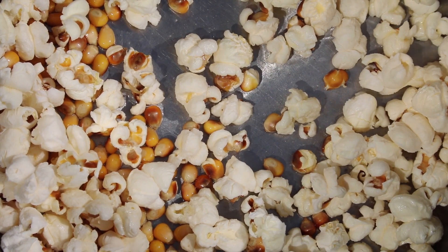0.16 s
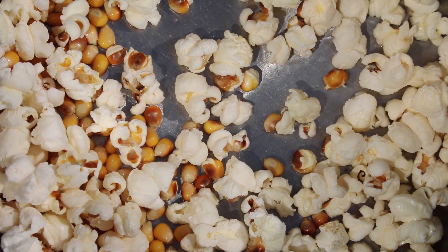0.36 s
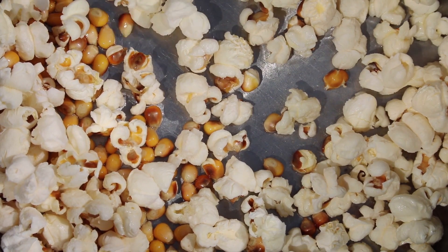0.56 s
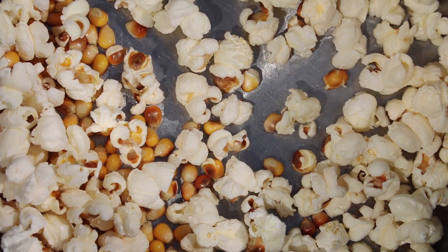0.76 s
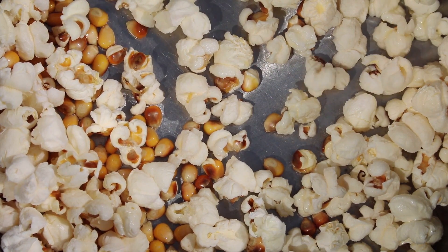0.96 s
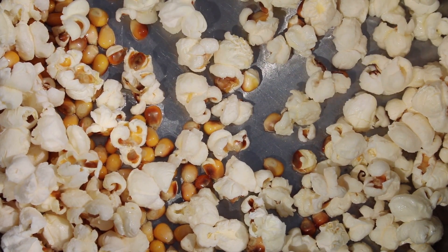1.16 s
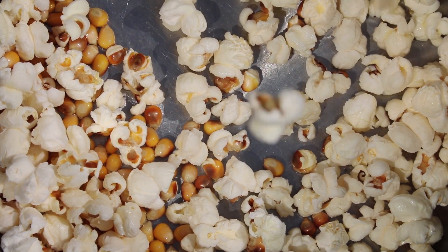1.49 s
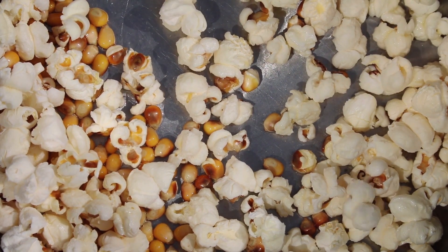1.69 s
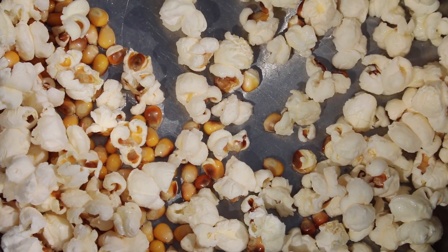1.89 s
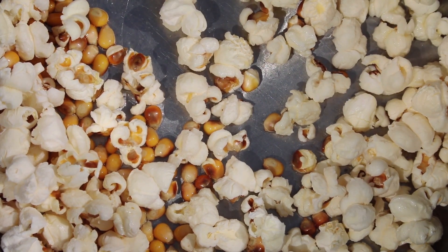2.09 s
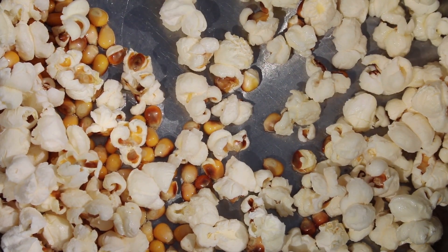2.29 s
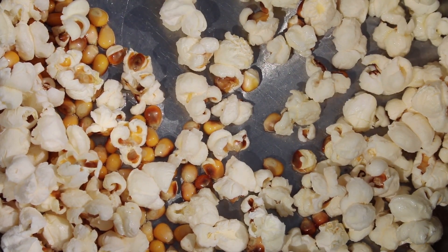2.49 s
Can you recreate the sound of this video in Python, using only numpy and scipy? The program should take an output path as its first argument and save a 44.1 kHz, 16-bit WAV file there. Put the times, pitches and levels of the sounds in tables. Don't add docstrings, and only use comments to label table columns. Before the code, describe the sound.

Popcorn popping in a deep metal pan, hard cracks and quick bounces above low fan rumble

```python
import sys
import numpy as np
from scipy import signal
from scipy.io import wavfile
from scipy.ndimage import uniform_filter1d

SR = 44100
rng = np.random.default_rng(int(sys.argv[2]) if len(sys.argv) > 2 else 0)


def how_loud(loudness_db):
    steps = np.asarray(loudness_db, float) / 20
    return 10 ** steps


def dump_mix(stems):
    frames = np.atleast_2d(stems).T
    limited = np.clip(frames, -1, 1)
    pcm = np.round(limited * 32767).astype(np.int16)
    wavfile.write(sys.argv[1], SR, pcm)


N = 116865


def evened(x):
    return x / np.sqrt(np.mean(x ** 2) + 1e-20)


def read(points, hz):
    f, value = np.transpose(points)
    return np.interp(np.log(hz + 1), np.log(f + 1), value)


def add(mix, start_s, sound):
    part = mix[:, round(start_s * SR):][:, :sound.shape[1]]
    part += sound[:, :part.shape[1]]


def moving_air(shape, level_db, patchy_db, swell_db):
    # f/Hz, width/Hz, level/dB
    duct = [(317, 48, 2), (593, 61, 4.5), (1020, 280, 5.5), (1680, 350, 5.5), (3290, 170, 3),
            (6100, 330, 3)]
    # f/Hz, share (0 to 1)
    likeness = [(30, 1), (130, 0.95), (290, 1), (640, 0.69), (1410, 0.32), (3100, 0.29), (6820, 0.012),
                (15000, 0.088)]
    # f/Hz, left minus right/dB
    balance = [(60, 0.0), (240, 0.5), (950, -0.5), (3770, 2.5), (15000, 9)]
    frames = N // 512 + 5
    hz = np.fft.rfftfreq(2048, 1 / SR)
    a, b, c, d, patches = rng.standard_normal((frames, 1025, 5)).T
    patches = uniform_filter1d(patches, size=14, axis=0)
    patches = evened(uniform_filter1d(patches, size=6, axis=1))
    swell = evened(uniform_filter1d(rng.standard_normal(frames), size=16))

    colour_db = read(shape, hz)
    for f, width, db in duct:
        colour_db += db / (1 + (2 * (hz - f) / width) ** 2)
    colour_db -= 40 * ((hz < shape[0][0]) | (hz > shape[-1][0]))

    same = np.clip(read(likeness, hz), 0, 1)[:, None]
    left = a + 1j * b
    right = same * left + np.sqrt(1 - same ** 2) * (c + 1j * d)
    z = np.array([left, right])
    z *= how_loud(colour_db[:, None] + patchy_db * patches + swell_db * swell)
    z *= how_loud(np.array([0.5, -0.5])[:, None, None] * read(balance, hz)[:, None])
    noise = signal.istft(z, nperseg=2048, noverlap=1536)[1][:, :N]
    return how_loud(level_db) * evened(noise)


def fan_air():
    # f/Hz, level/dB per Hz
    rumble = [(12, -52), (20, -19), (107, -4), (136, -6), (165, -0.5), (364, -7), (416, -27.5), (441, -20),
              (700, -17), (910, -44), (1540, -120)]
    # f/Hz, level/dB per Hz
    hiss = [(240, -37), (400, -1.5), (419, -8), (617, -4.5), (1360, -10.5), (5470, -14), (6100, -13.5),
            (12200, -22), (16200, -30)]
    low = moving_air(rumble, -34.5, patchy_db=1.5, swell_db=-0.3)
    return low + moving_air(hiss, -39, patchy_db=1.5, swell_db=-0.11)


def fan_hum():
    # f/Hz, width/Hz, level/dB
    tones = [(167.7, 5.7, -41), (196, 9.2, -49.5), (111.3, 8, -50)]
    t = np.arange(N) / SR
    out = np.zeros(N)
    for hz, width, db in tones:
        slow = signal.lfilter([1], [1, -np.exp(-np.pi * width / SR)], rng.standard_normal((2, N)))
        turn = 2 * np.pi * hz * t
        out += how_loud(db) * evened(slow[0] * np.cos(turn) + slow[1] * np.sin(turn))
    return out


def rattle(samples, swing_hz):
    # f/Hz, level/dB
    echo_colour = [(800, -28), (1400, -6), (2500, -5.5), (7000, -1), (10000, -2.5), (12000, -9.5),
                   (15000, -8), (17000, -19)]
    # f/Hz, t60/s
    echo_t60 = [(500, 0.039), (3000, 0.027), (8000, 0.017), (14000, 0.011)]
    strength, chance = np.split(rng.standard_normal((4, samples)), 2)
    echoes = strength * how_loud(4.5 * chance) * (chance > 0.6)
    hz, t, z = signal.stft(echoes, SR, nperseg=128)
    hz = hz[:, None]

    kitchen_tail = how_loud(-49 - 60 * t / 0.055)
    fade = how_loud(-60 * t / read(echo_t60, hz)) + kitchen_tail
    z = z * fade
    z = z * np.sqrt((fade ** 2).sum(1, keepdims=True) / (abs(z) ** 2).sum(2, keepdims=True))

    octaves = np.log2((hz + 1) / swing_hz)
    right_tilt_db = np.array([0, -7])[:, None, None] * np.log2(1 + hz / 4000)
    favour_db = 6.5 / (1 + (octaves / 0.11) ** 2)
    colour_db = read(echo_colour, hz) - 2 * octaves.clip(0) + right_tilt_db + favour_db
    out = signal.istft(z * how_loud(colour_db), SR, nperseg=128)[1][:, :samples]
    start_rms = np.sqrt(np.mean(out[:, :130] ** 2, axis=1, keepdims=True))
    return out / start_rms * how_loud([[0], [-5.5]])


def pan_ring(t, swing_hz, ring_db):
    # f/Hz, level/dB, t60/s
    pan = [(514, -13.5, 0.037), (1233, -26, 0.055), (1876, -19.5, 0.033), (2324, -23, 0.041),
           (2500, -16.5, 0.021), (3540, -10, 0.0083), (5400, -37, .02), (6830, -6, 0.016),
           (8000, -37, 0.033)]
    ring = np.zeros(len(t))
    for hz, db, t60 in pan:
        strike, detune = rng.standard_normal(2)
        above_db = 24 * np.log2(hz / swing_hz).clip(0) ** 2
        level_db = ring_db + db + 1.5 * strike - 60 * t / t60 - above_db
        ring -= how_loud(level_db) * np.sin(2 * np.pi * hz * (1 + 0.0057 * detune) * t)
    return ring * how_loud([[0], [-3]])


def pressure_swing(u):
    return 1.41 * u * np.exp(-u ** 2 / 2)


def pop(s, level_db, swing_hz, rattle_db, ring_db):
    t = np.arange(3072) / SR
    speed = 2 * np.pi * swing_hz
    u = speed * t - 3
    wall_s, wall_db = 0.00132, [[-10.5], [-14]]
    direct = pressure_swing(u) + how_loud(wall_db) * pressure_swing(u - speed * wall_s)

    rise = np.clip(t * swing_hz / 1.47, 0, 1) ** 2
    nearest_db = 10.5 * np.exp(-t / 0.00079)
    echoes = how_loud(rattle_db + nearest_db) * rattle(len(t), swing_hz)
    ring = pan_ring(t, swing_hz, ring_db)
    return s - 0.4 / swing_hz, how_loud(level_db) * (direct + rise * (echoes + ring))


def scene():
    pop_times = [.4397, .4598, .5090, .5257, .5608, .5875, .6018, .618, 1.022, 1.0312, 1.048, 1.0581, 1.083,
                 1.3613, 1.3627, 1.38, 1.3929, 1.3640, .4669]
    # level/dB, swing pitch f/Hz, rattle level/dB, pan ring level/dB
    kernels = [(3.5, 3100, -11.5, -8.5), (7.5, 3600, -15, -9), (-17, 3000, -8, 7), (-9, 2500, -13, 4.5),
               (7, 2000, -15, -2), (-13, 6800, -12, -18), (1.5, 5050, -18.5, 0.5), (-23.5, 3000, -8, -2),
               (3.5, 5570, -10, -4.5), (-3, 3600, -17, -9), (-23, 8000, -17, -11), (-3.5, 4340, -14, -0.5),
               (-24, 2700, -9, -4), (-4.5, 6000, -10.5, -5), (1, 3020, -17, -0.5), (-15, 2800, -22, -14),
               (-3, 3800, -14, -8), (-4, 10200, -9, -12), (-13, 2200, -20, -5)]
    mix = fan_air()
    for s, kernel in zip(pop_times, kernels):
        start_s, sound = pop(s, *kernel)
        add(mix, start_s, sound)
    return mix + fan_hum()


def low_pass(x):
    return signal.sosfilt(signal.butter(12, 15850, fs=SR, output="sos"), x)


def record(dry):
    lag = max(round(0.0097 * SR), 2)
    average = np.ones(lag) / lag
    power = signal.lfilter(average, 1, np.clip(dry, -2, 2) ** 2).mean(0)
    level_db = 10 * np.log10(abs(power) + 1e-12)
    recovery_db = np.arange(N) * 128 / SR
    held_db = np.maximum.accumulate(level_db + recovery_db) - recovery_db
    over_db = np.maximum(held_db + 22.5, 0)
    ducked = dry / how_loud(0.76 * signal.lfilter(average, 1, over_db))
    low_cut = signal.butter(2, 41, "high", fs=SR)
    clipped = np.clip(signal.lfilter(*low_cut, ducked), -0.97, 0.97)
    return low_pass(clipped)


dry = scene()
out = record(dry)
dump_mix(out)
```